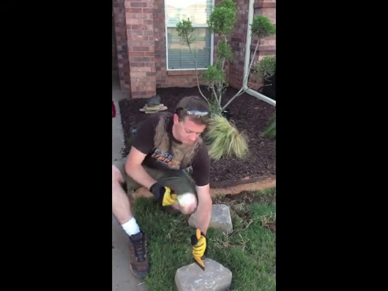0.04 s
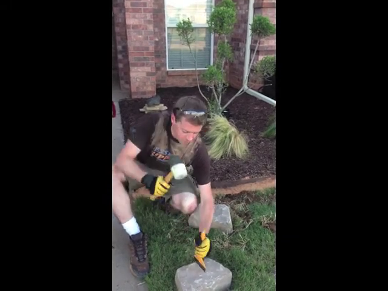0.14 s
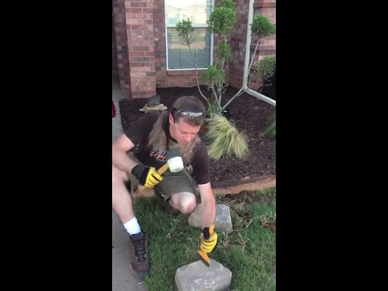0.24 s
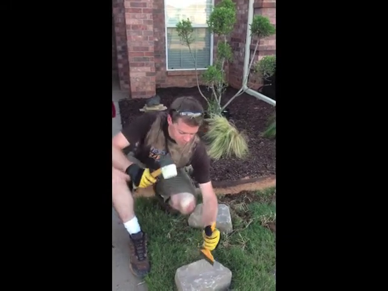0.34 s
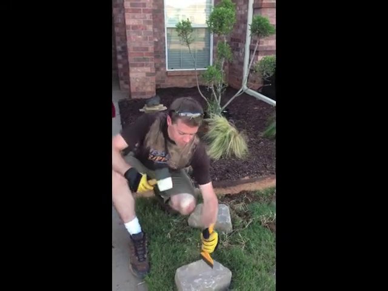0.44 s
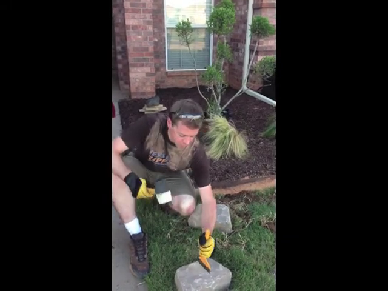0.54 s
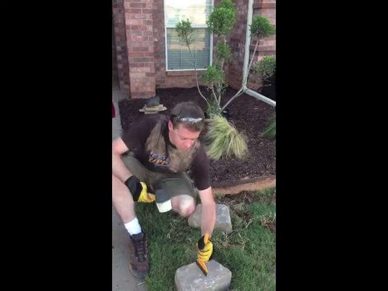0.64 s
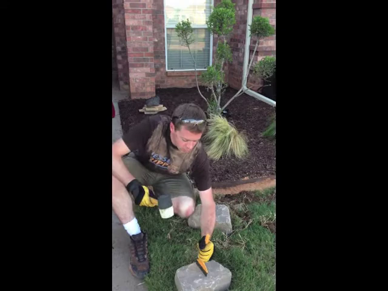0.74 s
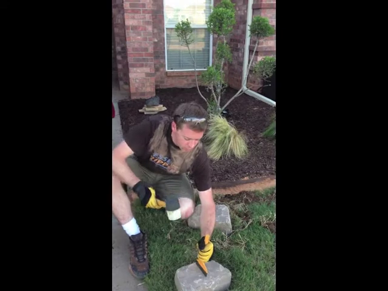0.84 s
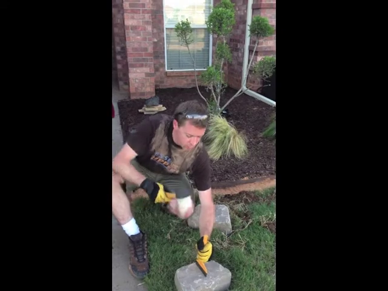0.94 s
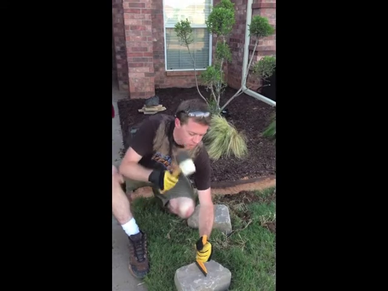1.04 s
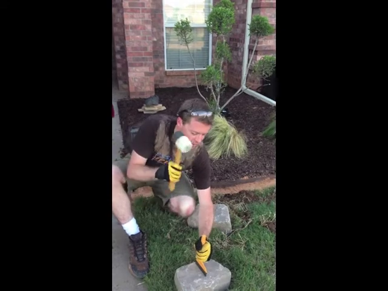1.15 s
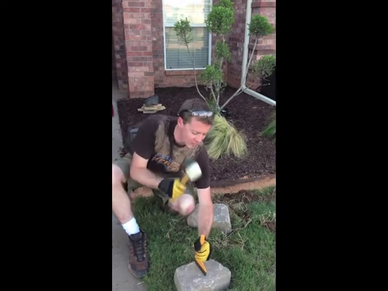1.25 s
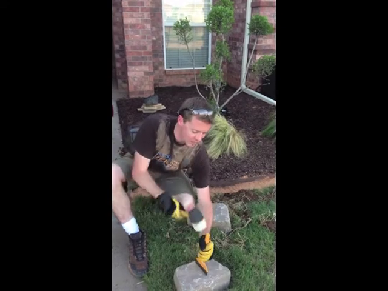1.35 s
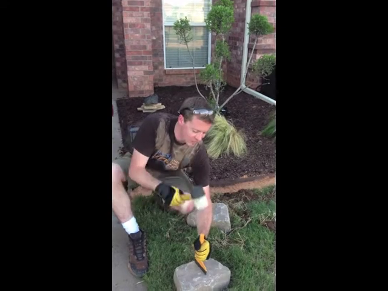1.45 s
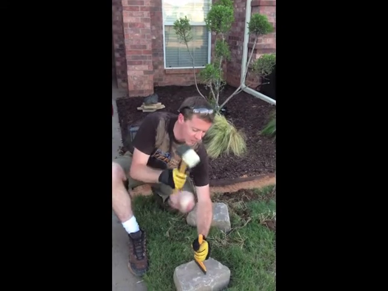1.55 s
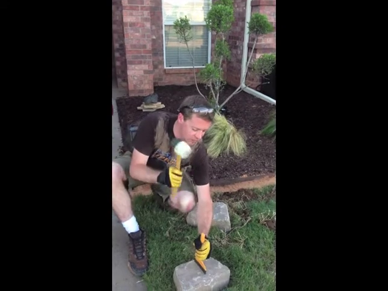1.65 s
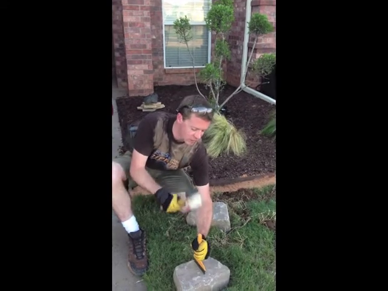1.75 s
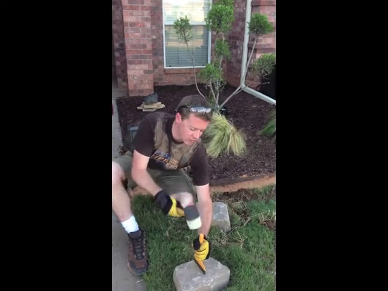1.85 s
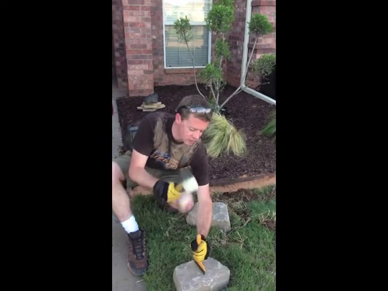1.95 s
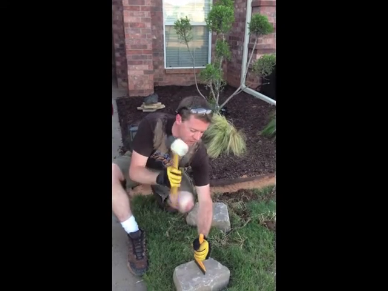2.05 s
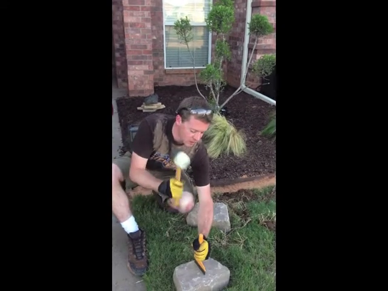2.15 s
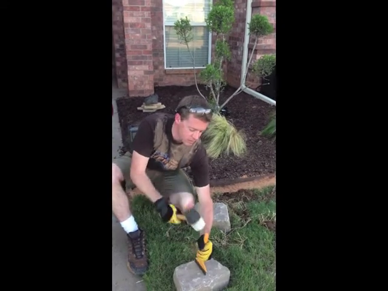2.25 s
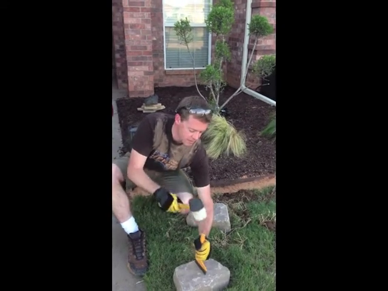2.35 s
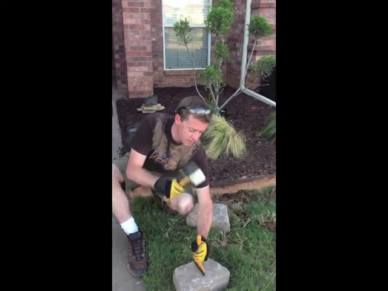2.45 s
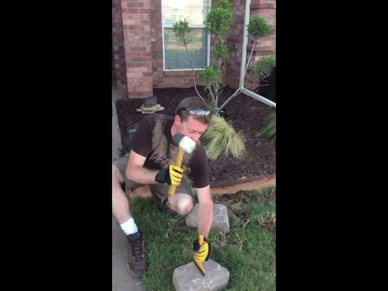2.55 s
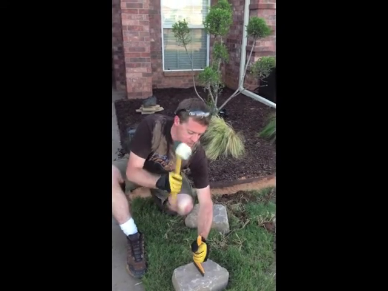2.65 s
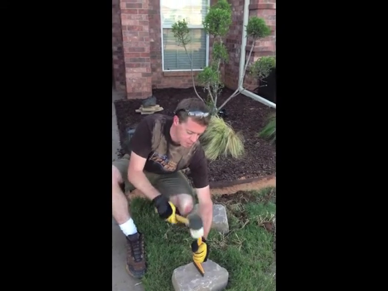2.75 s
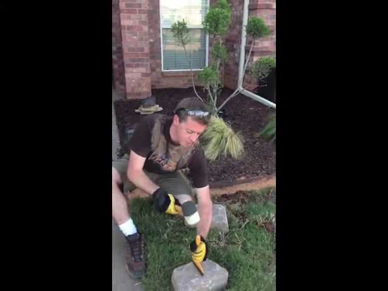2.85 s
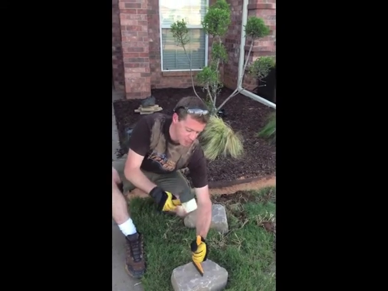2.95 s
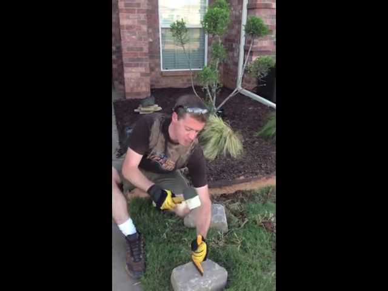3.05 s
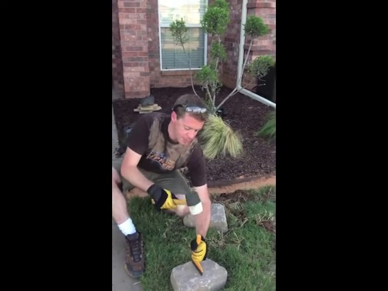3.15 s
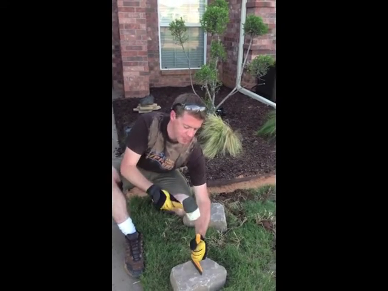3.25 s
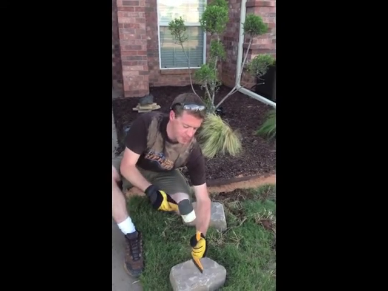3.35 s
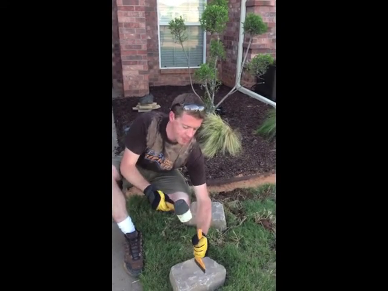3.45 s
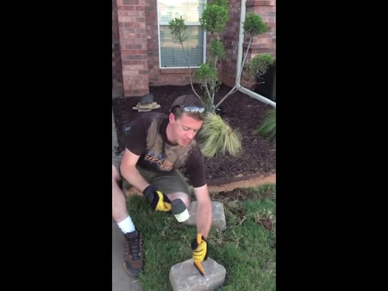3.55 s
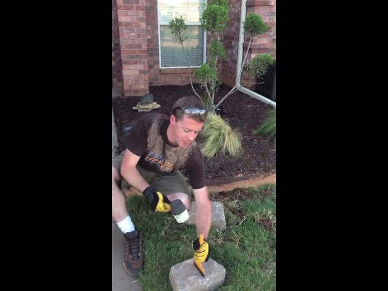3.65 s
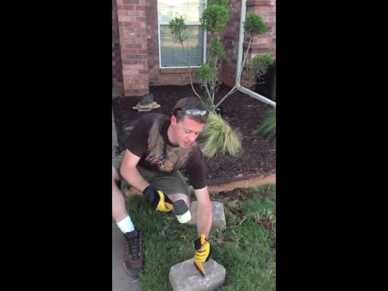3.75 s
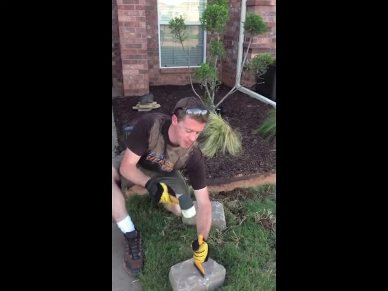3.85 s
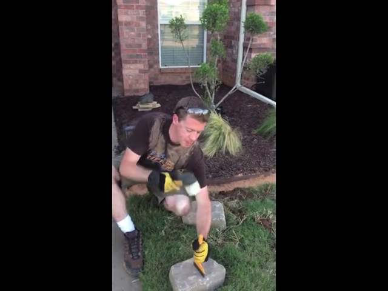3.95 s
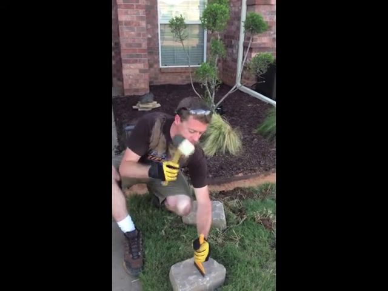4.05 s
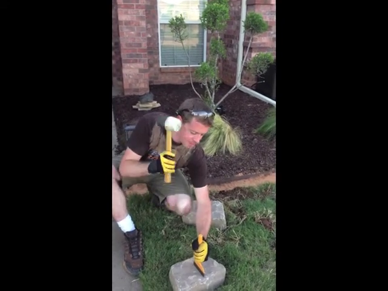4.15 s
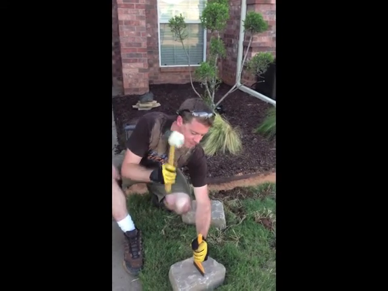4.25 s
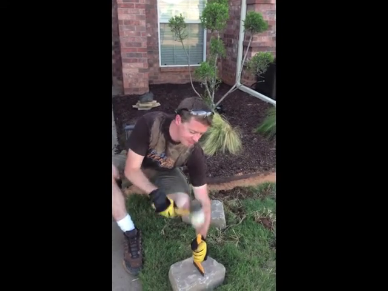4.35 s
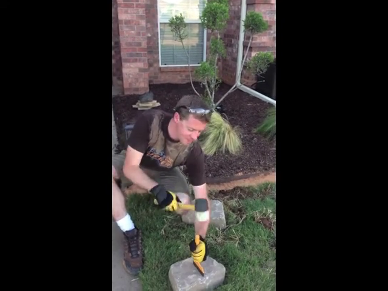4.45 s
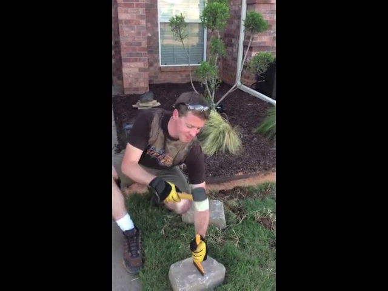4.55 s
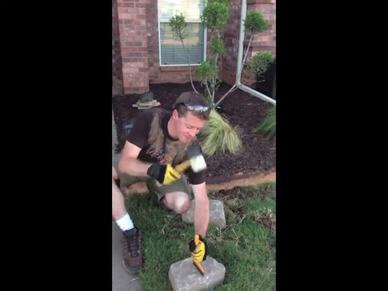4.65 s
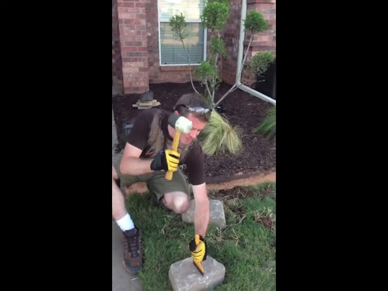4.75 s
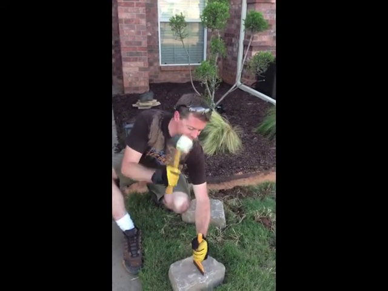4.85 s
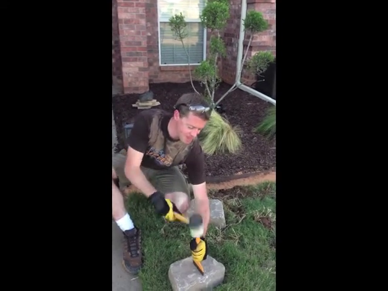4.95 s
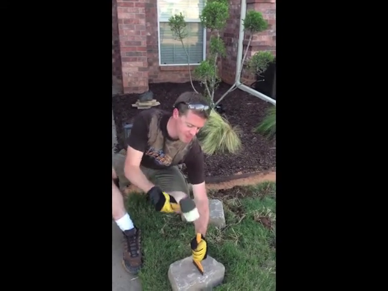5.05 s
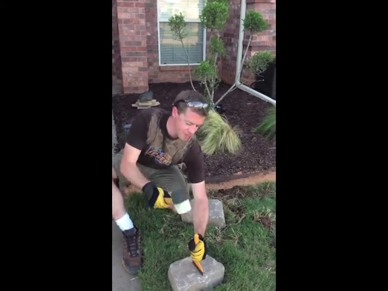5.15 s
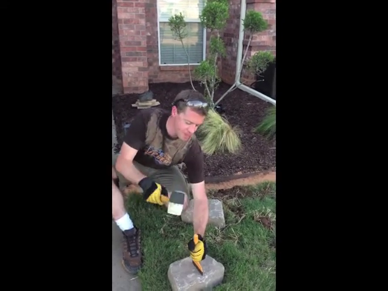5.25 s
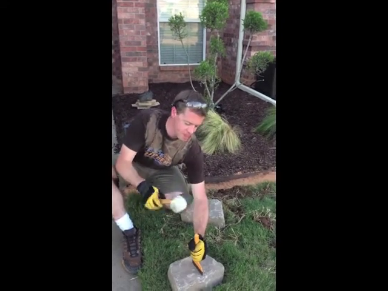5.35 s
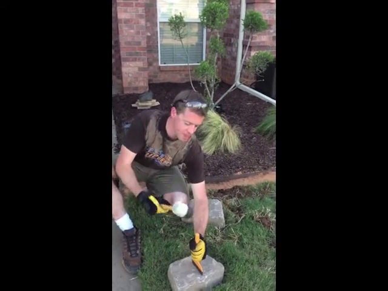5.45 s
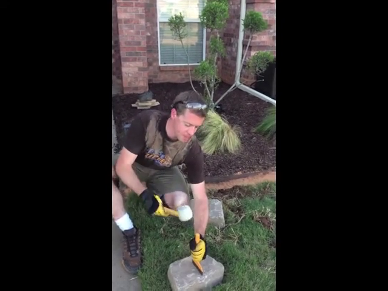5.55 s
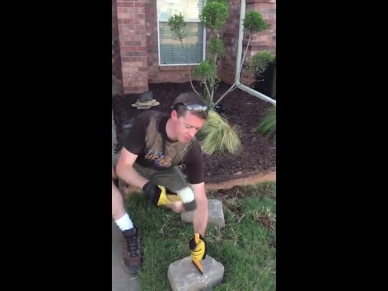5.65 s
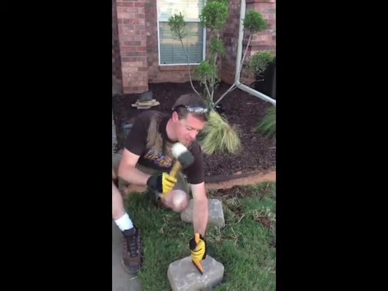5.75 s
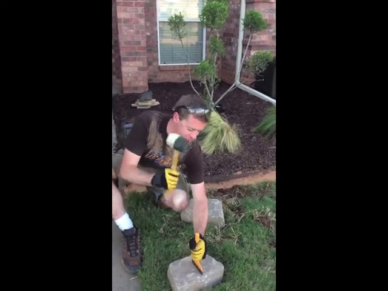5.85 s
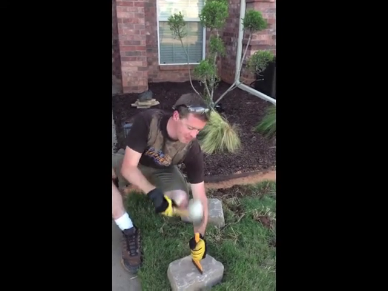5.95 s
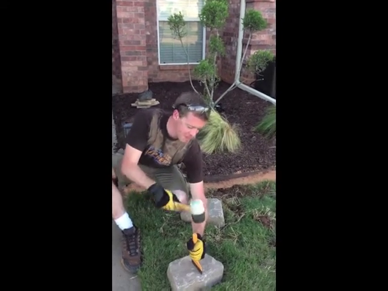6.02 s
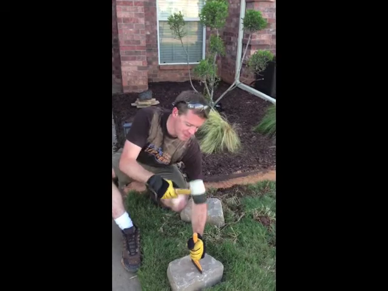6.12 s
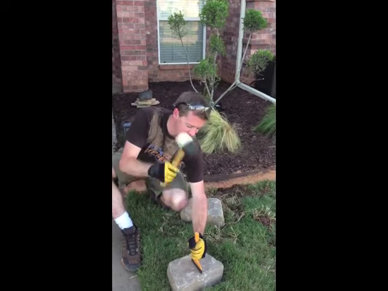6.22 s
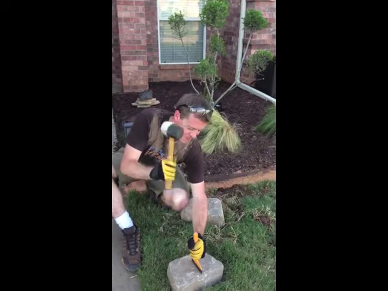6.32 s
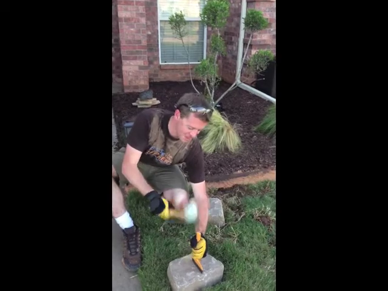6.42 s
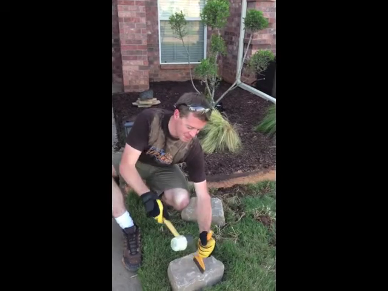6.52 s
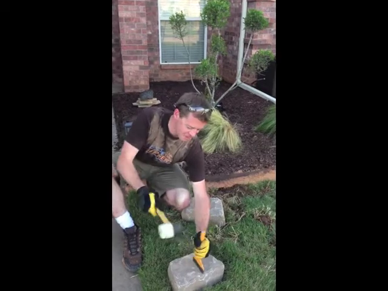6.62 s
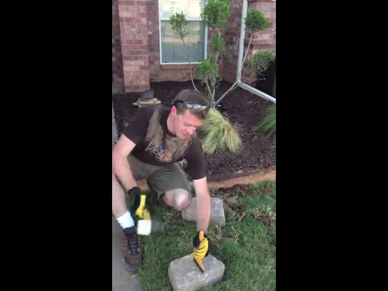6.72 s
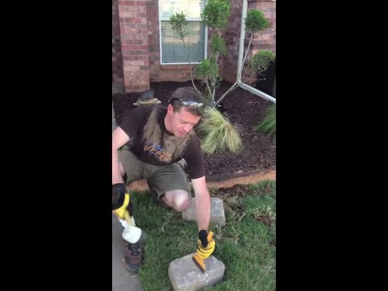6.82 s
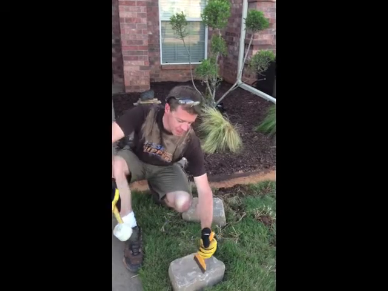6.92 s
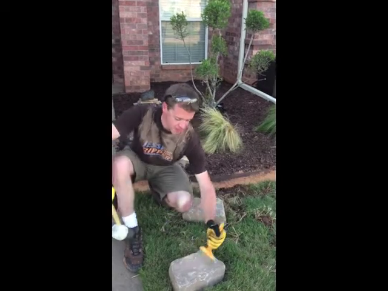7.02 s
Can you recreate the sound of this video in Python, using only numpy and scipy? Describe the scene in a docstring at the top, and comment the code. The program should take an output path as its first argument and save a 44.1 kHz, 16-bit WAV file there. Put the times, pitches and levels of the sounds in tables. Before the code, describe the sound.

A mallet knocks a steel chisel into a stone block outdoors in uneven single blows, with gritty metallic skips, rattles and soft bumps near the microphone.

```python
"""Mallet and chisel on a stone block

A mallet drives a hand-held steel chisel into a stone block on a lawn, in single blows at uneven intervals.
A gliding sine makes the block's thud, damped modes make the steel's clank, and dying noise makes the crunch.
The edge skips and rattles between blows, with soft bumps near the microphone and a brick wall answering.
Underneath lie a faint bird of gliding sines and an outdoor hush of shaped noise that dips and recovers;
the loudest peaks overload softly."""
import sys
import numpy as np
from scipy import signal
from scipy.fft import rfft, irfft, next_fast_len
from scipy.io import wavfile
from scipy.ndimage import map_coordinates

SR = 44100
rng = np.random.default_rng(int(sys.argv[2]) if len(sys.argv) > 2 else 0)


def master(y):
    """Save y as 16-bit WAV."""
    cut = np.clip(np.atleast_2d(y).T, -1, 1)
    pcm = np.round(cut * 32767)  # scale
    wavfile.write(sys.argv[1], SR, pcm.astype(np.int16))


N = 312228  # length in samples
T = np.arange(SR // 2) / SR  # seconds since a contact

# Mallet blows. Each row: start in seconds, relative push on the block in dB, relative clank in dB,
# relative crunch in dB, knock pitch in Hz, centre of the clank in Hz.
BLOWS = [(-0.06, -9, -12, -8, 590, 3200), (0.6899, -35, -22, -18, 576, 3100),
         (1.403, -12, -13.5, -16.5, 590, 2220), (1.864, -20.5, -6.5, -10.5, 421, 2780),
         (2.3106, -12.5, -16, -25, 617, 1960), (2.83, -14.5, -16.5, -20.5, 640, 2470),
         (3.636, -29, -16.5, -15, 730, 3040), (4.445, -13, -8, -12.5, 620, 3350),
         (5.035, -10, -18.5, -24.5, 414, 1910), (6.044, -5.5, -9, -18, 388, 2260),
         (6.51, -11, -13, -24, 572, 2080)]
# The chisel's edge landing on the stone. Each row: start in seconds, relative level in dB,
# relative weight of the low modes in dB.
CLINKS = [(1.2623, -24.5, -11), (1.3386, -18.5, -15), (1.4474, -13.5, -4.5), (1.5207, -19.5, -16),
          (1.8201, -16, -8), (2.3519, 0, -3.5), (2.3562, -10, -10), (2.3868, -7.5, -21), (2.4332, -19, -7),
          (2.465, -13.5, -9.5), (2.58, -18.5, -14.5), (3.348, -20, -23), (3.6547, -5.5, -11),
          (3.929, -27.5, 1), (6.5155, 3, -18.5), (6.573, -9.5, -20), (6.606, -6.5, -16),
          (6.6218, -10.5, -14), (6.677, -18, -17)]
# The jolted chisel rattling until it settles. Each row: start in seconds, length in seconds,
# relative level at the start in dB.
RATTLES = [(1.53, 0.11, -25), (2.402, 0.38, -29), (6.589, 0.26, -25.5)]
# The chisel lifted off the stone. Each row: start in seconds, relative level in dB,
# share of its free ringing time that the glove leaves.
LIFTS = [(3.347, -33.5, 0.22), (6.998, -34, 0.95)]
# Dull bumps near the microphone. Each row: start in seconds, relative level in dB, pitch in Hz.
BUMPS = [(1.041, -22.5, 180), (1.5, -23, 153), (2.072, -24, 189), (2.736, -23, 228), (2.982, -19.5, 218),
         (3.331, -24.5, 170), (3.651, -6.5, 266), (3.989, -5.5, 213), (4.233, -24.5, 248)]
# Runs of softer bumps. Each row: start in seconds, length in seconds, bumps per second,
# typical relative level in dB.
SHUFFLES = [(3.0, 0.9, 8, -27), (3.436, 0.18, 28, -21.5)]
# Modes of the chisel against the stone. Each row: pitch in Hz, relative level struck on the head in dB,
# relative level when the edge skips in dB, 60 dB decay in seconds (shortened in a skip).
STEEL_MODES = [(1509, 1.5, -5, 0.023), (1747, -13, 9, 0.04), (1950, -7.5, 1, 0.048), (2163, 2.5, 4, 0.028),
               (2350, -4.5, 0.5, 0.046), (2757, -13, -5, 0.14), (3036, -7.5, -2, 0.083),
               (3412, -4.5, -1.5, 0.048), (3836, -4, -28, 0.082), (4050, 0, -22, 0.028),
               (4510, -3, -12, 0.029), (5560, -9, -6, 0.024), (5500, -15, 9, 0.032),
               (6050, 3.5, -25, 0.021), (6780, -10, -10, 0.14), (6940, -3, -19, 0.058),
               (8280, -10, 3.5, 0.038), (10660, 4, -29, 0.027), (11950, 2.5, -14, 0.05),
               (12250, -23, -18.5, 0.19)]
# Modes of the lifted chisel. Each row: pitch in Hz, relative level in dB,
# 60 dB decay in seconds before the glove damps it.
FREE_MODES = [(1386, -13.5, 0.88), (3200, -12, 0.88), (3698, -14, 0.23), (5280, -10, 0.13), (6200, -9, .12),
              (6783, -9, 0.28), (8330, -3, 0.36), (10350, -10, 0.24), (12210, -17, .2), (14440, -20, .4),
              (15150, -21.5, .4)]
# Broad resonances of the edge grinding on stone. Each row: centre in Hz, width in Hz, relative level in dB.
EDGE_RESONANCES = [(1694, 450, 2), (3070, 2000, -10), (5440, 320, 7), (6060, 1300, -3), (8500, 400, -2),
                   (9440, 340, -24), (10540, 330, -9), (12850, 540, -18.5), (14900, 1100, -28)]
# Colour of the stone's knock. Each row: frequency in Hz, relative density in dB per Hz.
KNOCK_COLOUR = [(30, -41), (200, -8), (500, 9.5), (780, 4), (1020, 0), (1500, -0.5), (2200, -5),
                (3000, -30), (6000, -26)]
# Colour of the cracking stone. Each row: frequency in Hz, relative density in dB per Hz.
CRUNCH_COLOUR = [(500, -4.5), (2500, -20), (4000, -9), (6000, 4.5), (8500, 1.5), (11000, -9.5),
                 (16000, -34)]
# Colour of the grit under a skipping edge. Each row: frequency in Hz, relative density in dB per Hz.
GRIT_COLOUR = [(100, -25), (1000, -28), (4000, -18), (16000, -45)]
# Colour of the rubbing around a bump. Each row: frequency in Hz, relative density in dB per Hz.
RUB_COLOUR = [(40, 2), (150, 7.5), (400, -1.5), (700, -16.5), (1200, -30), (4000, -70)]
# Decay of the wall's echo. Each row: frequency in Hz, 60 dB decay in seconds.
WALL_DECAY = [(200, 0.19), (1000, 0.21), (3000, 0.11), (6000, 0.11), (13000, 0.093)]
# Colour of the wall's echo. Each row: frequency in Hz, relative level in dB.
WALL_COLOUR = [(60, 5), (200, 0.5), (400, 3.5), (1000, -11.5), (3000, 0), (7000, -4), (14000, -16)]
# Colour of the far tail. Each row: frequency in Hz, relative level in dB.
FAR_COLOUR = [(100, -32), (1000, -7), (2000, -6), (2850, 1.5), (3500, -10), (4400, 4), (5500, -14),
              (14000, -16)]
# A far bird. Each row: start in seconds, relative level in dB, pitch at the top of the arch in Hz.
CHIRPS = [(5.871, -51, 4600), (6.89, -51, 4540)]
# Colour of the outdoor hush. Each row: frequency in Hz, relative density in dB per Hz.
HUSH_COLOUR = [(15, -81), (25, -35), (59, -17), (96, -21.5), (133, -2.5), (183, 1), (469, -3.5), (509, -9),
               (762, -16.5), (919, -18.5), (1200, -19.5), (1850, -26), (4040, -28.5), (5010, -32.5),
               (15500, -40.5)]
# Slow course of the hush. Each row: time in seconds, relative rumble level in dB, relative hiss level in dB.
AIR_LEVELS = [(0.0, -40, -48), (1.79, -43, -48), (2.07, -48.5, -52), (2.38, -43, -50.5),
              (3.65, -47.5, -47.5), (4.02, -44, -47), (5.62, -40.5, -48.5), (7.08, -40.5, -47.5)]

THUD_HZ = 243.7  # reference for the thud's glide
KNOCK_DB, KNOCK_GROWS = -9, 0.34  # relative level at 0 dB push; dB gained per dB of push
AFTERRING_DB, AFTERRING_GROWS = -23, 1.7  # level at 0 dB clank; dB gained per dB of clank
AFTERRING_T60, AFTERRING_WIDTH = 0.4, 0.16  # seconds; share of the clank's centre
SKIP_SHIFT = 0.017  # typical share by which pitch differs between touches
GRAZE_S, GRAZE_DB = 0.0076, -14.5  # average spacing in seconds; level against the landing
RATTLE_PER_S, SETTLE_DB_PER_S = 24, 43  # ticks per second; fading of the ticks
RATTLE_LOW_DB = -9  # relative weight of a tick's low modes
SHUFFLE_HZ = 167  # usual pitch of the softer bumps
TOP_HZ = 15700  # upper band limit


def amp(db):
    """Turn decibels into gain."""
    return 10 ** (np.asarray(db) / 20)


def unit(x):
    """Scale to rms 1."""
    return x / np.sqrt(np.mean(x ** 2) + 1e-20)


def along(points, hz):
    """Read a curve of (Hz, value) points on a log frequency axis."""
    f, v = np.transpose(points)
    return np.interp(np.log(hz + 1), np.log(f + 1), v)


def colour(points):
    """Make a gain response from (Hz, dB) points."""
    return lambda hz: amp(along(points, hz))


def humps(resonances):
    """Make a gain response from resonant humps whose powers add."""
    def response(hz):
        gains = (amp(db) / (1 + (2 * (hz - centre) / width) ** 2) for centre, width, db in resonances)
        return np.sqrt(sum(gain ** 2 for gain in gains))
    return response


def fade(t60):
    """Die away exponentially, losing 60 dB in t60 seconds."""
    return np.exp(-np.log(1000) * T / t60)


def rise(seconds):
    """Soften the start of a contact."""
    return 1 - np.exp(-T / seconds)


def filtered(x, response):
    """Shape the spectrum by a gain response."""
    size = next_fast_len(len(x) + SR // 4)
    spectrum = rfft(x, size) * response(np.fft.rfftfreq(size, 1 / SR))
    return irfft(spectrum, size)[:len(x)]


def bass_cut(x, corner_hz):
    """Cut the bass with a third-order high-pass."""
    return signal.sosfilt(signal.butter(3, corner_hz, "highpass", fs=SR, output="sos"), x)


def noise(response, size):
    """Make coloured noise of rms 1."""
    return unit(filtered(rng.standard_normal(size), response))


def wobble(rate, size):
    """Draw a smooth random curve with rate knots a second."""
    knots = rng.standard_normal(int(size * rate / SR) + 4)
    return map_coordinates(knots, [np.arange(size) * rate / SR])


def uneven(length, count):
    """Pick irregular moments, one somewhere in each equal share of the length."""
    return (np.arange(count) + rng.random(count)) * length / count


def burst(response, t60):
    """Make dying coloured noise that starts near rms 1."""
    return unit(noise(response, len(T)) * fade(t60)) * np.sqrt(np.mean(fade(t60) ** 2))


def ring(hz, db, t60, scatter_db, detune):
    """Sum damped modes; grip and contact point can shift their strength and pitch at each contact."""
    gain = amp(db + scatter_db * rng.standard_normal(len(hz)))
    pitch = hz * (1 + detune * rng.standard_normal(len(hz)))
    phase = 2 * np.pi * (pitch[:, None] * T + rng.random((len(hz), 1)))
    modes = np.sin(phase) * fade(t60[:, None])
    return gain / np.linalg.norm(gain) @ modes


def add(track, s, sound):
    """Mix a sound into the track at s seconds, trimmed at both ends."""
    start = round(s * SR)
    heard = sound[max(-start, 0):]
    part = track[max(start, 0):][:len(heard)]
    part += heard[:len(part)]


def block_thud(push_db, t60=0.015):
    """The soil lets the block swing only two or three times, slowing as the load lifts."""
    pitch = THUD_HZ * (0.86 + 0.48 * fade(0.021))
    swing = np.sin(2 * np.pi * np.cumsum(pitch) / SR)
    return amp(push_db + 22.5) * swing * rise(0.0035) * fade(t60)


def stone_knock(push_db, knock_hz, t60=0.015):
    """The stone's knock grows with the push; its pitch depends on where the mallet lands."""
    knock_db = KNOCK_DB + KNOCK_GROWS * push_db
    tone = np.sin(2 * np.pi * knock_hz * T) * fade(t60)
    return amp(knock_db + 11.5) * tone + amp(knock_db + 8.5) * burst(colour(KNOCK_COLOUR), t60=0.028)


def steel_clank(clank_db, centre_hz, chatter, spread=0.34):
    """The struck steel bends in its lower modes; a harder contact favours the higher of them."""
    hz, head_db, _, t60 = np.transpose(STEEL_MODES)
    low = hz < 5000
    favour = lambda f: 1 / (1 + (np.log((f + 1) / centre_hz) / spread) ** 2)
    favoured_db = head_db[low] + 9 * (favour(hz[low]) - 1)
    bending = ring(hz[low], favoured_db, t60[low], scatter_db=3, detune=0.0008)
    clank = amp(clank_db + 6.0) * bending * chatter + amp(clank_db + 6.5) * burst(favour, t60=0.025)
    # a blurred ring lingers at the clank's centre
    afterring = burst(humps([(centre_hz, AFTERRING_WIDTH * centre_hz, 0)]), AFTERRING_T60)
    return clank + amp(AFTERRING_DB + AFTERRING_GROWS * clank_db) * afterring


def edge_crunch(crunch_db, chatter):
    """The biting edge cracks the stone, grinds on it and rings the steel's high modes."""
    hz, head_db, _, t60 = np.transpose(STEEL_MODES)
    high = hz >= 5000
    ringing = ring(hz[high], head_db[high], t60[high], scatter_db=3, detune=.002)
    grind = burst(humps(EDGE_RESONANCES), t60=0.032)
    crack = burst(colour(CRUNCH_COLOUR), t60=0.013)
    return amp(crunch_db - 2) * ringing * chatter + amp(crunch_db + 5.0) * grind + amp(crunch_db + 11.0) * crack


def blows():
    """Each blow rocks the block, knocks the stone, clanks the steel and crushes grit under the edge."""
    track = np.zeros(N)
    for s, push_db, clank_db, crunch_db, knock_hz, centre_hz in BLOWS:
        # the edge chatters against the stone while the steel rings, which roughens its tones
        chatter = amp(3.5 * wobble(276, len(T)))
        knock = stone_knock(push_db, knock_hz)
        clank = steel_clank(clank_db, centre_hz, chatter)
        crunch = edge_crunch(crunch_db, chatter)
        blow = block_thud(push_db) + rise(0.00061) * (knock + clank + crunch)
        add(track, s, yard(blow, near_db=-11.0, wall_db=-15))
    return track


def skip(db, low_db):
    """One touch of the edge: a scrape on the stone that also rings the steel, weighted by low_db."""
    hz, _, edge_db, t60 = np.transpose(STEEL_MODES)
    weight_db = lambda f: (low_db + 6.5) / (1 + (f / 4200) ** 8)
    # pressure on the stone shifts the modes from one skip to the next
    shift = np.exp(SKIP_SHIFT * rng.standard_normal())
    steel = ring(shift * hz, edge_db + weight_db(hz), .7 * t60, scatter_db=3, detune=.012)
    grinding = humps(EDGE_RESONANCES)
    grit = colour(GRIT_COLOUR)
    scrape = burst(lambda f: grinding(f / shift) * amp(weight_db(f)) + grit(f), t60=0.018)
    return (amp(db - 5.0) * steel + amp(db) * scrape) * rise(0.0016)


def clinks():
    """The edge grazes the stone twice, then lands; straight after a blow it lands at once."""
    track = np.zeros(N)
    for s, db, low_db in CLINKS:
        after_blow = any(0 < s - blow[0] < 3 * GRAZE_S for blow in BLOWS)
        if not after_blow:
            graze = skip(db + GRAZE_DB, low_db)
            for early in GRAZE_S / 2 + uneven(2 * GRAZE_S, count=2):
                add(track, s - early, graze)
        add(track, s, yard(skip(db, low_db), near_db=-12.0, wall_db=-17))
    return track


def rattles():
    """The loose chisel ticks on the stone ever more faintly as it comes to rest."""
    track = np.zeros(N)
    for s, length, db in RATTLES:
        ticks = np.zeros(len(T))
        for t in uneven(length, count=round(length * RATTLE_PER_S)):
            add(ticks, t, skip(db - SETTLE_DB_PER_S * t, RATTLE_LOW_DB))
        add(track, s, yard(ticks, near_db=-15.0, wall_db=-16))
    return track


def lift():
    """Off the stone, only the glove damps the chisel's free modes."""
    track = np.zeros(N)
    hz, mode_db, t60 = np.transpose(FREE_MODES)
    for s, db, share in LIFTS:
        modes = ring(hz, mode_db, share * t60, scatter_db=0, detune=0)
        add(track, s, amp(db) * rise(0.00066) * modes)
    return track


def bumps(swell=0.0021, scatter_db=2, detune=0.15):
    """Soft low thumps, single or in runs, swell and die within a few cycles amid a little rubbing."""
    track = np.zeros(N)
    thumps = list(BUMPS)
    for s, length, rate, db in SHUFFLES:
        for t in uneven(length, count=round(length * rate)):
            thump_db = db + scatter_db * rng.standard_normal()
            thump_hz = SHUFFLE_HZ * np.exp(detune * rng.standard_normal())
            thumps.append((s + t, thump_db, thump_hz))
    for s, db, hz in thumps:
        push = np.sin(2 * np.pi * hz * T) * (T / swell) ** 2 * np.exp(-T / swell)
        rub = noise(colour(RUB_COLOUR), len(T)) * np.exp(-((T - .024) / 0.02) ** 2)
        add(track, s, amp(db + 6) * push)
        add(track, s - .02, amp(0.77 * db - 16) * rub)  # the rubbing grows less than the push
    return track


def yard(sound, near_db, wall_db, far_db=-31, delay=.026, near_t60=0.12, near_hz=900, far_t60=0.6):
    """Scatter from the ground and the worker, the brick wall's diffuse echo, then a faint far tail."""
    near = burst(lambda hz: hz / (hz + near_hz), near_t60) * rise(0.0025)
    # the echo decays at its own pace in each frequency band
    hz, t, bands = signal.stft(rng.standard_normal(len(T)), SR, nperseg=256)
    decay = amp(-60 * t / along(WALL_DECAY, hz)[:, None])
    tail = signal.istft(bands * decay, SR, nperseg=256)[1][:len(T)]
    wall = filtered(unit(tail * rise(0.00084)), colour(WALL_COLOUR))
    far = burst(colour(FAR_COLOUR), far_t60) * rise(0.025)
    answer = amp(near_db) * unit(near) + amp(far_db) * unit(far)
    add(answer, delay, amp(wall_db) * wall)
    return sound + signal.fftconvolve(sound, answer / np.sqrt(len(T)))[:len(T)]


def bird():
    """Thin whistles arch in pitch with a slight wobble, blurred by distance."""
    track = np.zeros(N)
    for s, db, top_hz in CHIRPS:
        arch = 1 - 0.082 * np.minimum(((T - .022) / 0.011) ** 2, 2)
        pitch = top_hz * (arch + .025 * wobble(530, len(T)))
        call = np.sin(2 * np.pi * np.cumsum(pitch) / SR) * np.exp(-((T - .03) / .022) ** 2)
        add(track, s, yard(amp(db) * call, near_db=5, wall_db=0))
    return track


def hush():
    """Shaped noise splits into a wavering distant rumble and a smoother hiss; both dip and recover."""
    s, rumble_db, hiss_db = np.transpose(AIR_LEVELS)
    level = lambda db: np.interp(np.arange(N) / SR, s, db)
    air = noise(colour(HUSH_COLOUR), N)
    low = filtered(air, lambda hz: 1 / (1 + (hz / 750) ** 4))
    rumble = amp(level(rumble_db) - 0.3 + 1.6 * wobble(10, N)) * unit(low)
    hiss = amp(level(hiss_db) + 0.6) * unit(air - low)
    return rumble + hiss


def scene():
    """Mix everything at one microphone, with the deep bass of the contacts cut."""
    contacts = blows() + clinks() + rattles() + lift() + bumps()
    outdoors = bird() + hush()
    return (bass_cut(contacts, corner_hz=114) + outdoors)[None]


def record(dry, top=1.05):
    """Overload rounds off the loudest peaks, then a steep low-pass sets the band limit."""
    clipped = dry[0] / (1 + np.abs(dry[0] / top) ** 8) ** (1 / 8)
    return filtered(clipped, lambda hz: 1 / (1 + (hz / TOP_HZ) ** 80))[None]


dry = scene()
out = record(dry)
master(out)
```